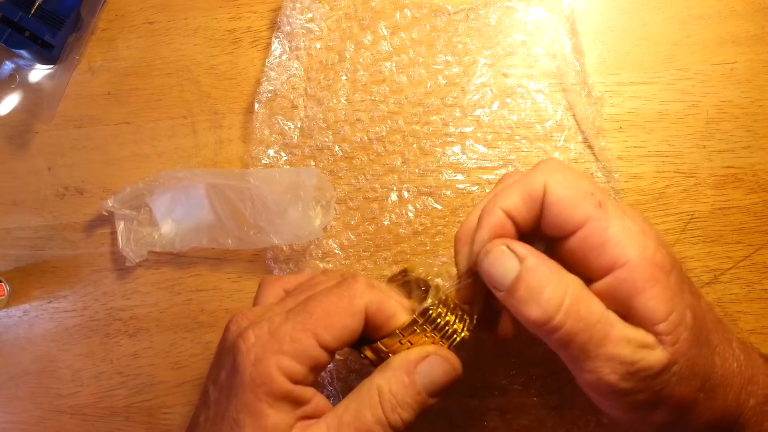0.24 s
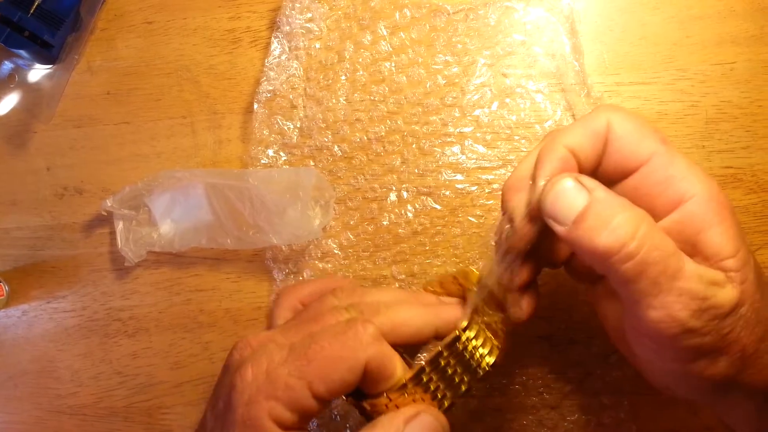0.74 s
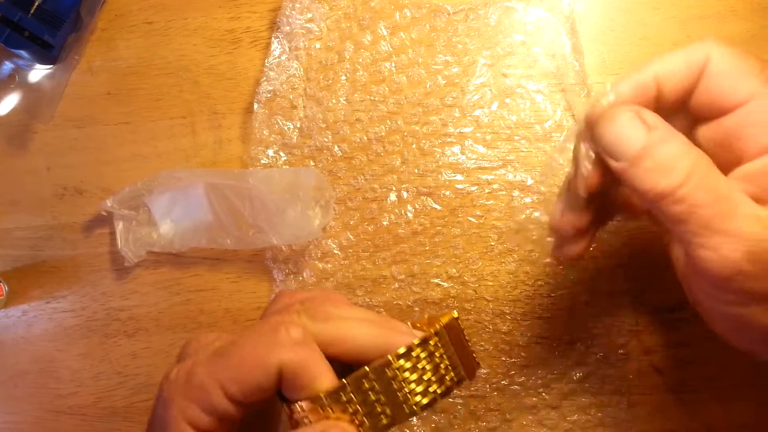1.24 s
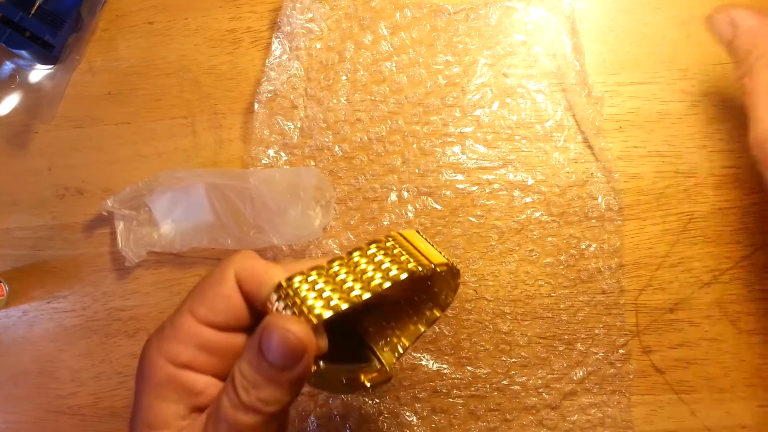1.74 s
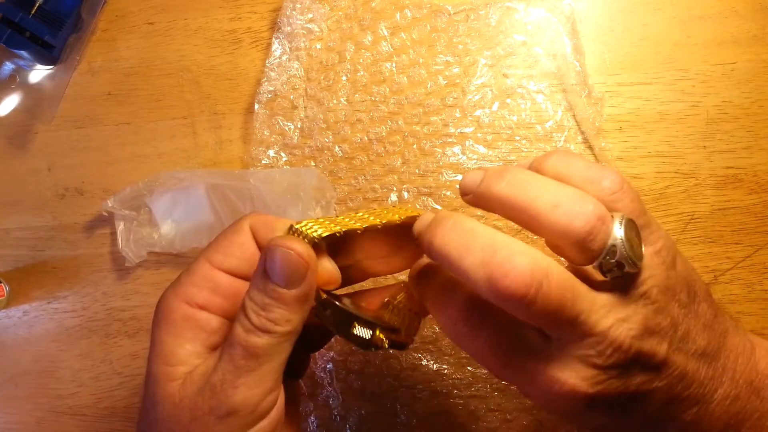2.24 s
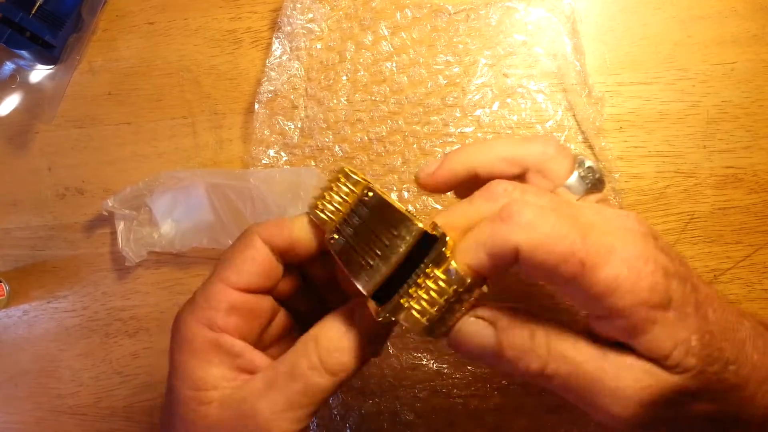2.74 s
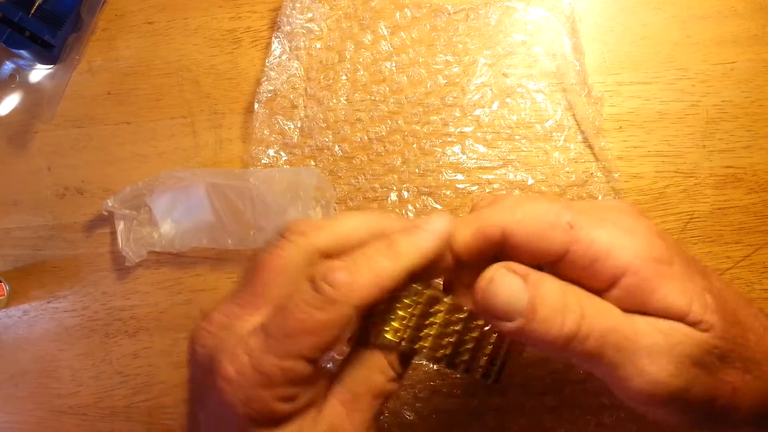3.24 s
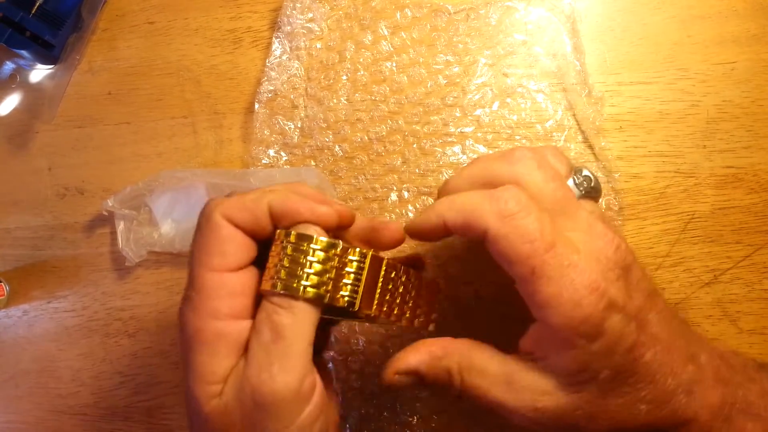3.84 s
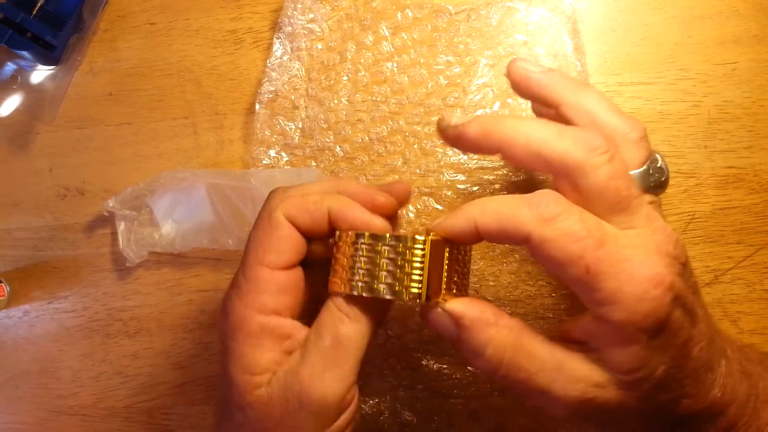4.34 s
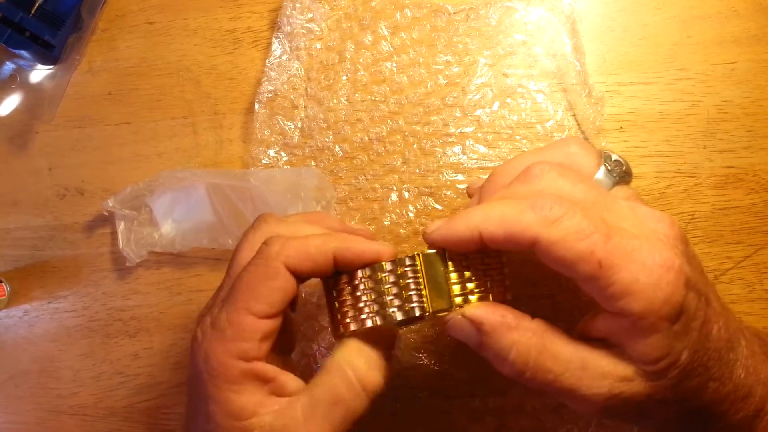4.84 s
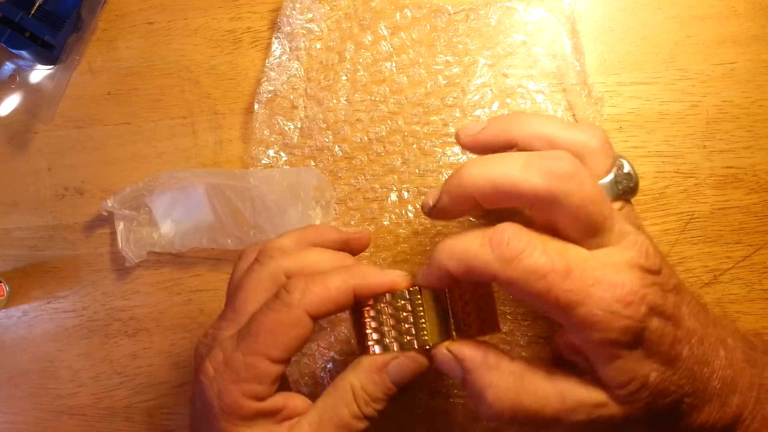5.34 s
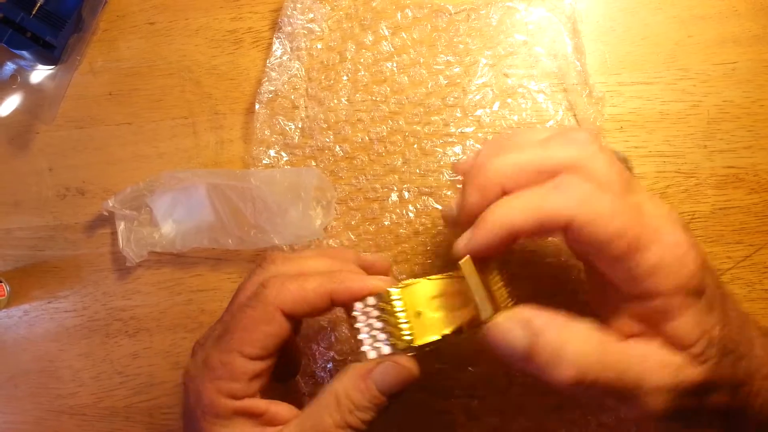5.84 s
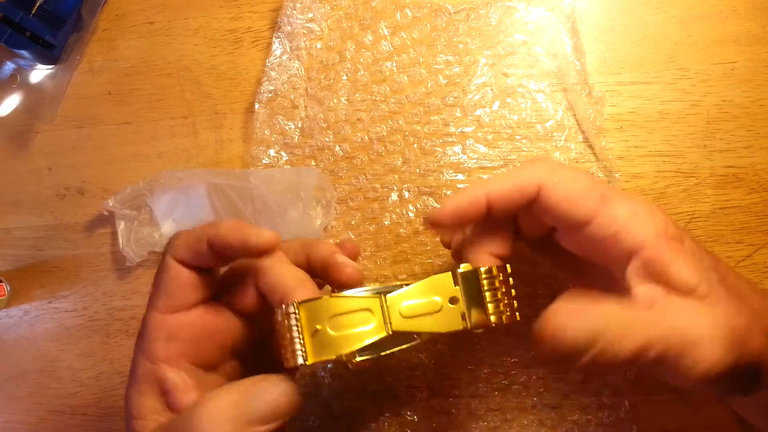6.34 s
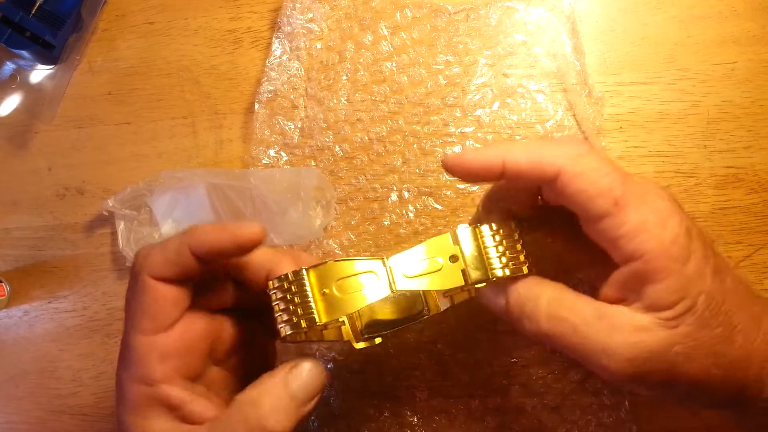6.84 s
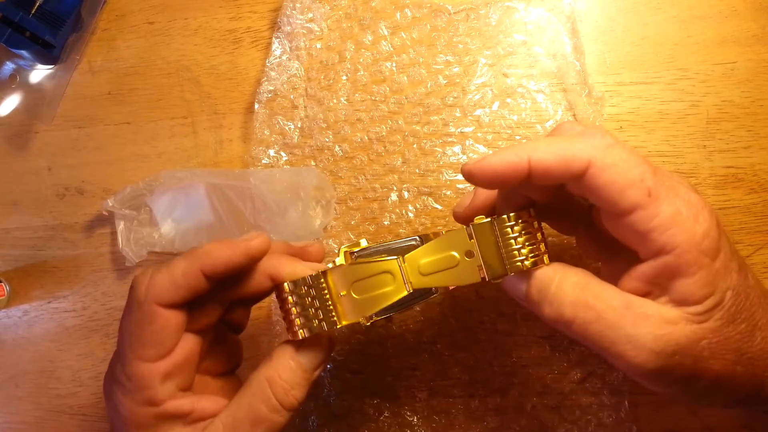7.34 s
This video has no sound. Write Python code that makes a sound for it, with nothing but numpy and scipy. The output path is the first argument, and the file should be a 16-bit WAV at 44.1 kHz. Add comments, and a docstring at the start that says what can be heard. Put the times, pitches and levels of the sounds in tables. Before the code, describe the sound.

A metal watch bracelet is turned in the fingers close to the microphone in a small room. It starts with a few hard knocks and clicks, then goes quieter with soft rubbing of skin. Light ticks return, the fold-over clasp snaps open with a brief bright rattle about halfway through, and scattered link ticks follow before thinning out. Low room noise, hiss and a thin electrical buzz on the left continue throughout.

```python
"""The metal links of a watch bracelet knock and tick as it is turned in the fingers above a wooden desk.
Each contact is a hard crack, a chatter of loose pins and a short, finger-damped ring.
The fold-over clasp snaps open with a rattle of thin leaves, and skin rubs along the band in tiny slips.
All this sounds in a small room, over low noise, hiss and a thin electrical buzz on the left."""
import sys
import numpy as np
from scipy import signal
from scipy.fft import rfft, irfft
from scipy.io import wavfile

SR = 44100
rng = np.random.default_rng(int(sys.argv[2]) if len(sys.argv) > 2 else 0)


def to_wav(s):
    """Save 16-bit WAV."""
    ch = np.atleast_2d(s).T  # columns
    pcm = np.round(np.clip(ch, -1, 1) * 32767)  # PCM
    wavfile.write(sys.argv[1], SR, pcm.astype(np.int16))


N = 334249


def from_db(db):
    """Decibels to amplitude."""
    return 10 ** (np.asarray(db) / 20)


def rms_one(x):
    """Scales a sound to unit rms."""
    return x / np.sqrt(np.mean(x ** 2) + 1e-20)


def butter(x, hz, kind, order=2):
    """Causal Butterworth filter."""
    sections = signal.butter(order, np.clip(hz, 10, .45 * SR), kind, fs=SR, output="sos")
    return signal.sosfilt(sections, x)


def at_hz(points, hz, column=1):
    """One column of a table, read on a log-frequency axis."""
    points = np.array(points)
    return np.interp(np.log(np.maximum(hz, 1)), np.log(points[:, 0]), points[:, column])


def add(out, s, sound):
    """Mixes a sound in at time s."""
    start = int(np.clip(round(s * SR), 0, N - 1))
    out[start:start + len(sound)] += sound[:N - start]


def stereo(mid, side, correlation):
    """Two noises become left and right; more correlation narrows the image."""
    return np.sqrt(1 + correlation) * mid + np.sqrt(1 - correlation) * side * [[1], [-1]]


# EQ and width of the noise bed: f/Hz, relative level/dB, left-right correlation
ROOM_TONE_EQ = [(25, -16, 0), (59.5, 0, 0), (118, 4.5, 0.012), (198, 3, 0), (357, -2, 0.43),
                (620, -6.5, 0.4), (860, -7.5, 0.16), (1050, -6, 0.1), (1330, -11, 0.2), (2610, -15, 0),
                (4460, -16, 0), (5600, -20.5, 0), (9400, -17.5, 0), (14800, -18.5, 0)]
def room_tone(level_db):
    """A wide, steady bed of low room noise and microphone hiss."""
    hz = np.fft.rfftfreq(N, 1 / SR)
    mid, side = rfft(rng.standard_normal((2, N)))
    spectrum = stereo(mid, side, at_hz(ROOM_TONE_EQ, hz, column=2)) * from_db(at_hz(ROOM_TONE_EQ, hz))
    return from_db(level_db) * rms_one(irfft(spectrum, N))


def buzz(rate_hz, gain_db, right_bleed):
    """A square electrical pulse leaks into the left input and is rounded by its filters."""
    start_s, width_s, allpass_hz = .0095, .0014, 95
    since_pulse = (np.arange(N) / SR - start_s) % (1 / rate_hz)
    pulse = np.clip((width_s - since_pulse) * SR, 0, 1)
    pulse = butter(pulse, [257, 1177], "band", order=1)
    pulse = butter(pulse, 89, "high")
    pole = np.exp(-2 * np.pi * allpass_hz / SR)
    pulse = signal.lfilter([pole, -1], [1, -pole], pulse)   # the lows trail the edge
    return from_db(gain_db) * butter(pulse, 6200, "low", order=1) * np.array([[1], [-right_bleed]])


# early reflections off desk and hands: t/s, level/dB
REFLECTIONS = [(.0029, -12), (.0052, -12.5), (.0084, -16)]
# reverb tail: f/Hz, t60/s, level/dB against the direct sound
REVERB_TAIL = [(300, 0.28, -5.5), (790, 0.31, -7.5), (2030, 0.23, -5), (4400, 0.26, -7.5), (7500, .22, -6),
               (14000, 0.19, -8)]
def small_room(x, correlation):
    """Direct sound, early reflections and a diffuse tail that builds and dies band by band."""
    length, build_s = int(.4 * SR), .005
    t, response = np.arange(length) / SR, np.zeros((2, length))
    response[:, 0] = 1
    for s, db in REFLECTIONS:
        for channel in response:
            channel[int(abs(s + rng.normal(0, .00006)) * SR)] += from_db(db)
    edges_hz = np.geomspace(150, 16000, 11)
    for low, high in zip(edges_hz, edges_hz[1:]):
        centre = np.sqrt(low * high)
        mid, side = butter(rng.standard_normal((2, length)), [low, high], "band", order=3)
        envelope = (1 - np.exp(-t / build_s)) * from_db(-60 * t / at_hz(REVERB_TAIL, centre))
        tail = stereo(mid, side, correlation) * envelope / np.sqrt(2 * np.sum(envelope ** 2))
        response += from_db(at_hz(REVERB_TAIL, centre, column=2)) * tail
    return signal.fftconvolve(x, response, axes=1)[:, :N]


# finger strokes along the band: centre t/s, half length/s, level/dB
FINGER_STROKES = [(.23, 0.04, -57), (1.085, .05, -57.5), (1.625, .03, -60), (2.13, 0.013, -57.5),
                  (2.243, 0.012, -55.5), (2.51, 0.036, -57.5), (2.94, 0.052, -57.5), (3.15, .07, -63.5),
                  (3.283, 0.0081, -48), (3.87, .06, -62), (4.29, 0.027, -50.5), (5.176, .01, -59),
                  (5.974, 0.0076, -48.5), (6.25, 0.025, -54), (7.11, 0.027, -64)]
def finger_pressure():
    """The rubbing envelope: a restless grip, strokes, and a short slide as the links catch at a tick."""
    grip_db, swing_db, shifts_per_s = -74, 3, 8
    slide_lead_s, slide_half_s, slide_vs_tick_db = .0021, .018, -18.5
    t = np.arange(N) / SR
    wander = np.interp(t * shifts_per_s, np.arange(200), rng.standard_normal(200))
    power = from_db(grip_db + swing_db * wander) ** 2
    slides = [(s - slide_lead_s, slide_half_s, db + slide_vs_tick_db) for s, db, _ in LINK_TICKS]
    for s, half_s, db in FINGER_STROKES + slides:
        power += from_db(db) ** 2 * np.exp(-np.minimum(((t - s) / half_s) ** 2, 50))
    return np.sqrt(power)


# EQ of skin on metal: f/Hz, relative level/dB
RUB_EQ = [(300, -3.5), (1200, -4.5), (2300, -0.5), (4300, 2), (6200, -5.5), (10000, -6), (15000, -8)]
def rubbing(slips_per_s, spread_db, hiss):
    """Skin drags over the links: a grain of tiny slips over soft hiss, swelling with each stroke."""
    sizes = from_db(spread_db * np.minimum(rng.exponential(1, N), 4)) * rng.choice([-1, 1], N)
    slips = rms_one(sizes * (rng.random(N) < slips_per_s / SR))
    pressure = finger_pressure()
    friction = slips + hiss * rng.standard_normal(N)
    eq = from_db(at_hz(RUB_EQ, np.fft.rfftfreq(N, 1 / SR)))
    return pressure * rms_one(irfft(rfft(friction) * eq, N))


# pan path of the hand-held watch: t/s, left over right level/dB, left delay/s
PAN_PATH = [(.4, -0.5, 0.000021), (.95, -2, 0.0000087), (3.0, 0, 0.000026), (3.7, -0.8, .00007),
            (6.3, -3, .00004)]
def add_panned(out, s, hit):
    """Places a stereo hit where the watch is held at time s."""
    times, balance_db, delay_s = np.transpose(PAN_PATH)
    pan = from_db(np.interp(s, times, balance_db) / 2)
    add(out[0], s + np.interp(s, times, delay_s), hit[0] * pan)
    add(out[1], s, hit[1] / pan)


# the thud, clack, clink and tick bands: low f/Hz, high f/Hz
HIT_BANDS = [(360, 1210), (1380, 2430), (2850, 5240), (5900, 13800)]
def metal_hits(cues, modes, crack_t60, chatter_db, chatter_t60, ring_db, detune, width, scoop):
    """Metal on metal: a crack, a chatter of loose pins and damped modes; cues set each band's attack."""
    length, attack = int(.08 * SR), int(.003 * SR)
    t, out = np.arange(length) / SR, np.zeros((2, N))
    hz, mode_db, t60 = np.transpose(modes)
    decays = from_db(mode_db[:, None] - 60 * t / t60[:, None])
    burst = from_db(-60 * t / crack_t60) + from_db(chatter_db - 60 * t / chatter_t60)
    for s, *levels_db in cues:
        # grip and contact point shift the modes and favour other ones each time
        pitches = hz * (1 + detune * rng.standard_normal(len(hz)))
        strengths = rng.choice([-1, 1], len(hz)) * (1 + width * rng.normal(0, 0.94, (2, len(hz))))
        ring = strengths @ (decays * np.sin(2 * np.pi * pitches[:, None] * t))
        # the small parts radiate differently to each side, and little between the mode clusters
        crack = burst * (rng.standard_normal(length) + width * rng.standard_normal((2, length)))
        crack -= scoop * butter(crack, [5800, 9000], "band", order=1)
        full_range, hit = crack + from_db(ring_db) * ring, 0
        for edges_hz, level_db in zip(HIT_BANDS, levels_db):
            band = butter(full_range, edges_hz, "band", order=3)
            attack_rms = np.sqrt(np.mean(band[:, :attack] ** 2))
            hit = hit + from_db(level_db) * band / attack_rms
        add_panned(out, s, hit)
    return out


# bright ring of the clasp leaves: f/Hz, level/dB, t60/s
LEAF_RING = [(3402, -4, .022), (3750, -2, .018), (4081, 0, .03), (4400, -1, .022), (4710, -5, .022),
             (7494, -9, .016), (8000, -7, .018), (10150, -3, .016), (10470, -1, .025), (11200, 0, .028),
             (11600, -3, .016), (12150, -2, .016), (14300, -6, .014)]
# the snap and its rattle: t/s, then level/dB of thud, clack, clink and tick
CLASP_CUES = [(3.6653, -34, -29, -19, -19), (3.6721, -48, -36.5, -25, -20.5), (3.6754, -52, -47, -36, -20),
              (3.6813, -43, -38, -26, -27), (3.6872, -47, -40, -25, -22), (3.6899, -39.5, -40, -23, -20)]
def clasp():
    """The thin leaves of the clasp spring free and rattle."""
    return metal_hits(CLASP_CUES, LEAF_RING, crack_t60=.0047, chatter_db=-39, chatter_t60=.019,
                      ring_db=-15, detune=.018, width=1.0, scoop=.16)


def stray_ticks(count, per_s, level_db, brightness_db, scatter_db):
    """Handling sets off faint ticks at random: rows of t/s, level/dB, brightness/dB."""
    chance = rng.standard_normal((count, 4))
    times = np.cumsum(np.mean(chance[:, :2] ** 2, axis=1)) / per_s   # exponential gaps
    voicing_db = [level_db, brightness_db] + scatter_db * chance[:, 2:]
    return np.column_stack([times, voicing_db])[times < N / SR]


def tick_cue(s, level_db, brightness_db):
    """Voices a light tick in four bands; it hardly moves the case, so thud and clack stay low."""
    thud_db, clack_db = level_db - 13.5, level_db - 10
    return s, thud_db, clack_db, level_db - brightness_db / 2, level_db + brightness_db / 2


# ring of the band and case: f/Hz, level/dB, t60/s
BRACELET_RING = [(520, -7, .016), (690, -4, .016), (950, -9, .014), (1680, -1, .02), (1850, 1, .024),
                 (1965, 1, .024), (2132, 0, .022), (2460, -3, .022), (3128, -6, .016), (3750, -2, .014),
                 (4350, -2, .014), (4872, -2, .016), (5330, -1, .02), (7000, -7, .012), (7880, -5, .022),
                 (9800, -3, .018), (12600, -4, .014)]
# single links tick as the band bends: t/s, level/dB, brightness/dB (tick band over clink band)
LINK_TICKS = [(0.0857, -43, -5), (0.2223, -45.5, -10), (0.268, -46.5, -4), (.3022, -44.5, 0),
              (0.6408, -39, 2), (.7039, -36.5, -9), (0.749, -48, -3), (0.7738, -41, -3), (0.7889, -41.5, 0),
              (.8693, -43.5, -3), (1.6233, -47, -8), (2.228, -56, -8), (2.6665, -56.5, 0), (2.88, -50.5, 1),
              (2.9201, -48.5, 10), (3.0062, -44, 2), (3.0246, -37, 8.5), (3.0314, -45.5, 9),
              (3.1513, -45, -8.5), (3.199, -51, -1), (3.2593, -48, 4), (3.305, -47, 5), (3.4049, -46, 2),
              (3.637, -49.5, 5), (3.819, -53, 20), (3.959, -51, 2), (3.9958, -36, 3), (4.0825, -48.5, 2),
              (4.26, -38, 2), (4.2995, -41, 3), (4.3063, -44, -14), (4.327, -45.5, 3), (4.3902, -51.5, -1),
              (4.5883, -52, -7), (4.9946, -54.5, -9), (5.1928, -44.5, 7.5), (5.676, -41.5, 9),
              (5.6828, -43.5, 2), (5.7823, -43.5, 2.5), (5.9143, -46.5, 0), (5.9656, -48, 5),
              (6.0721, -48.5, 0), (6.1083, -40.5, 5.5), (6.2724, -53, -12), (6.311, -47.5, -6)]
# hard knocks of case and band: t/s, then level/dB of thud, clack, clink and tick
KNOCK_CUES = [(.4109, -29.5, -32.5, -31, -21.5), (.4132, -33, -31.5, -19, -22.5),
              (.4335, -42, -33, -23, -33), (.4403, -25, -29.5, -26, -39), (.4452, -41, -32.5, -31, -37),
              (.4512, -27, -30, -20, -20), (.646, -32.5, -28, -25, -31.5), (.6539, -50, -49, -31, -32.5),
              (.7651, -34, -39, -38.5, -46), (.8937, -26.5, -17, -19.5, -24), (.8966, -54, -24, -43, -28),
              (.9277, -26, -18.5, -21.5, -24), (.9355, -45, -41, -23.5, -17.5)]
def links():
    """The links knock and tick, hard and short, damped by the fingers that hold them."""
    strays = stray_ticks(count=60, per_s=2.0, level_db=-61, brightness_db=-4, scatter_db=4)
    cues = KNOCK_CUES + [tick_cue(*row) for row in [*LINK_TICKS, *strays]]
    return metal_hits(cues, BRACELET_RING, crack_t60=.0046, chatter_db=-21, chatter_t60=.056,
                      ring_db=-18.5, detune=.022, width=.8, scoop=.033)


def scene():
    """Links, clasp and fingers share the room, over a bed of room tone and buzz."""
    bed = room_tone(level_db=-53.5) + buzz(rate_hz=30.0472, gain_db=-27.5, right_bleed=.076)
    fingers = rubbing(slips_per_s=2600, spread_db=6.0, hiss=.32)
    return bed + small_room(fingers + clasp() + links(), correlation=.21)


def record(dry):
    """A steep high cut takes the air off the mix."""
    cutoff_hz = 14500
    return signal.sosfilt(signal.ellip(10, .2, 70, cutoff_hz, fs=SR, output="sos"), dry)


dry = scene()
out = record(dry)
to_wav(out)
```